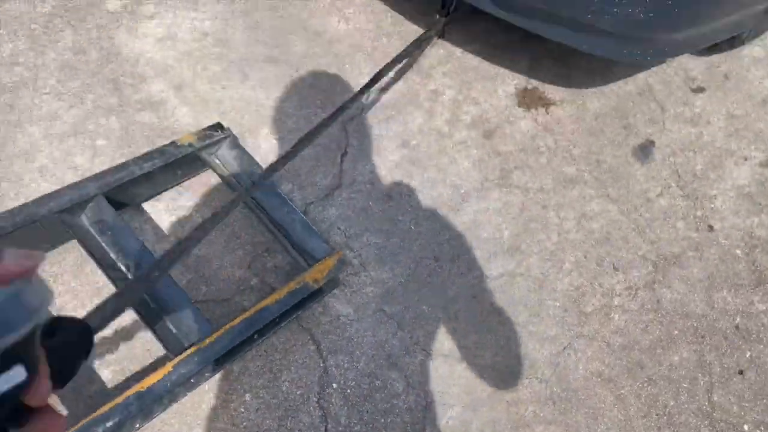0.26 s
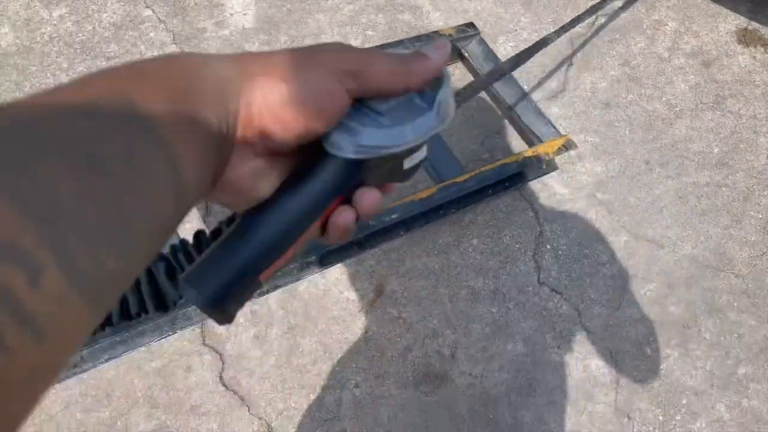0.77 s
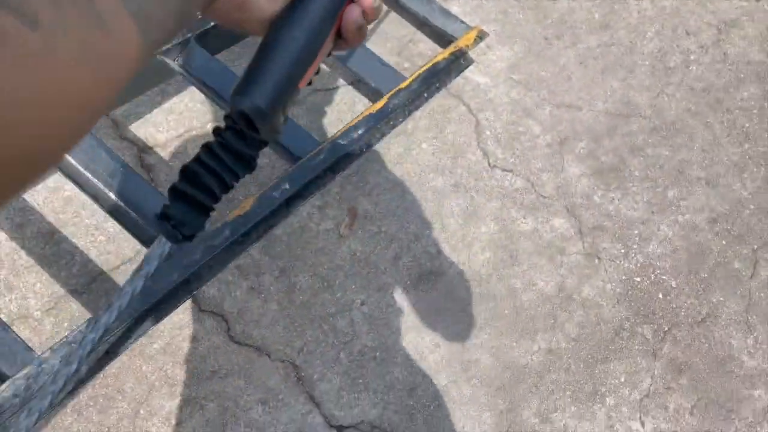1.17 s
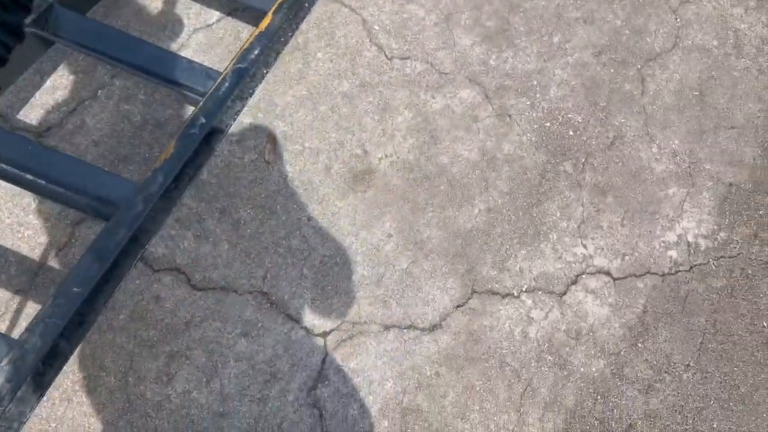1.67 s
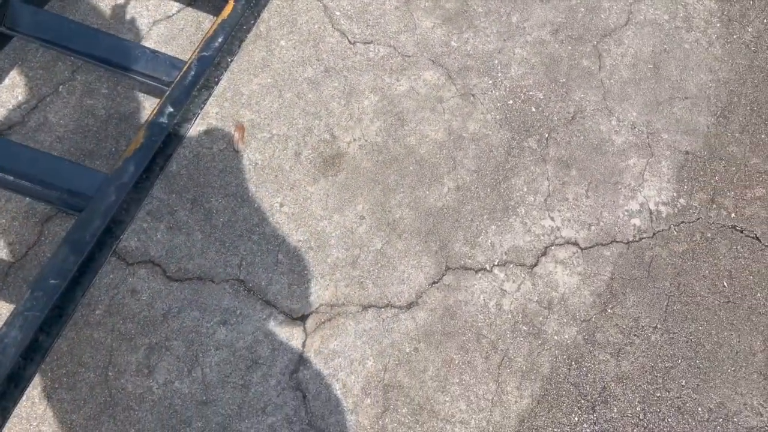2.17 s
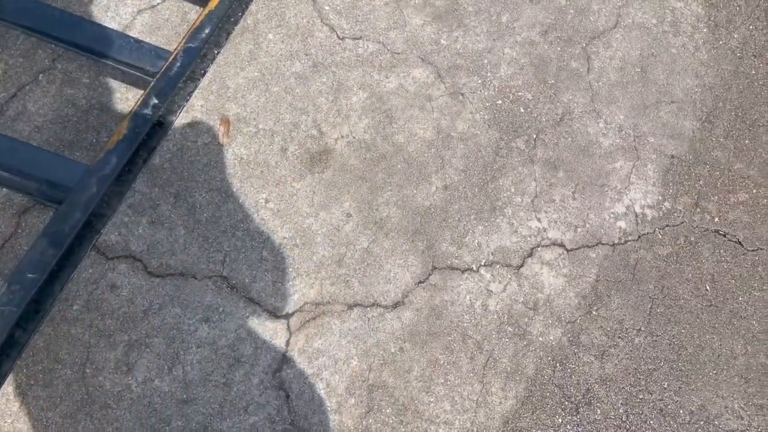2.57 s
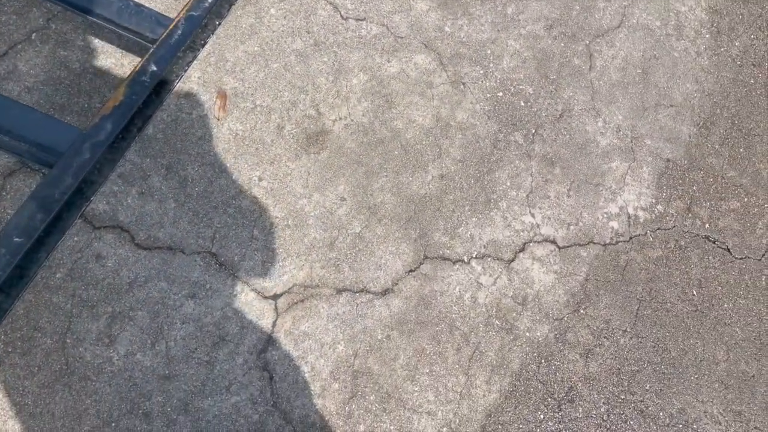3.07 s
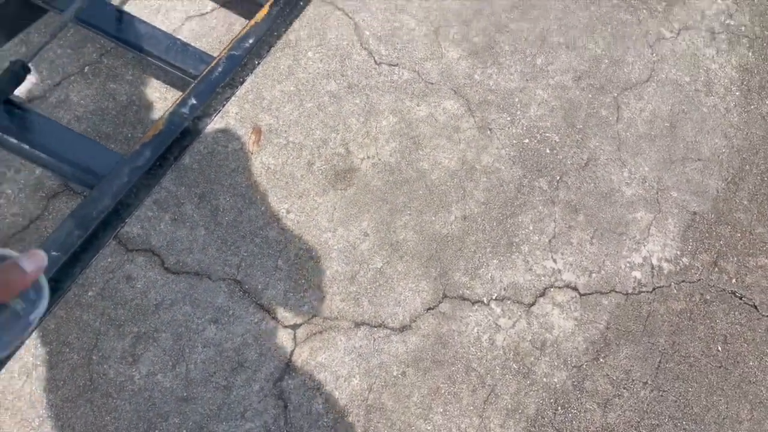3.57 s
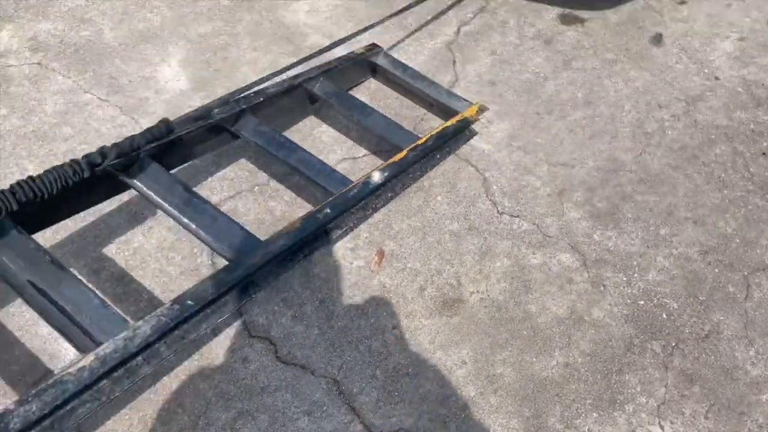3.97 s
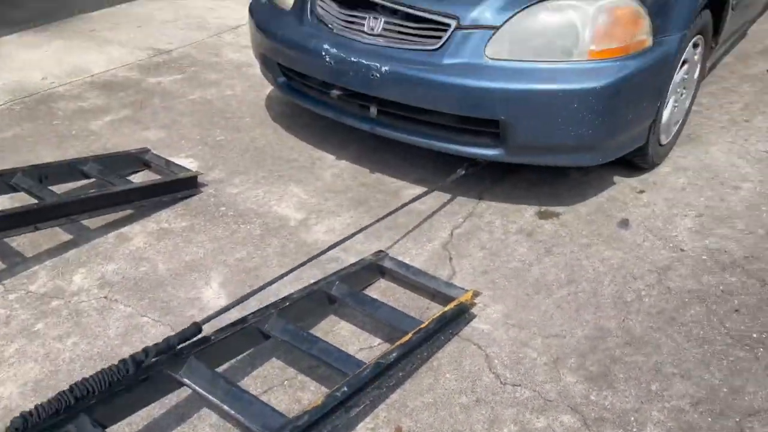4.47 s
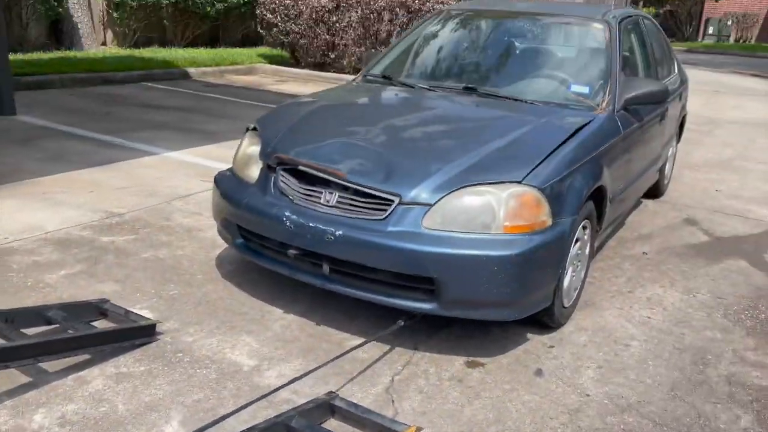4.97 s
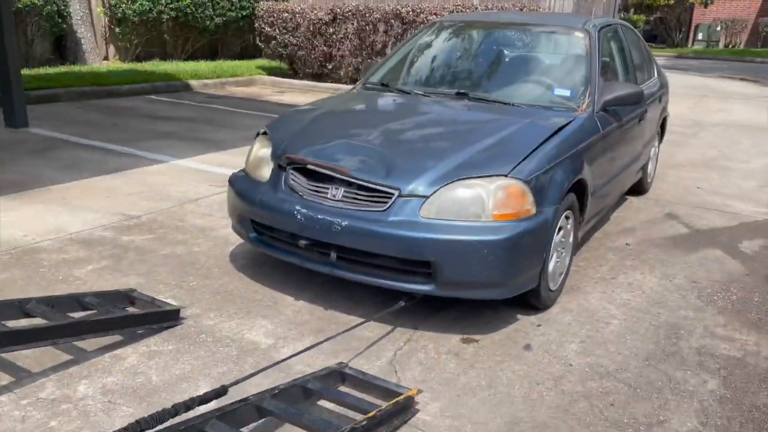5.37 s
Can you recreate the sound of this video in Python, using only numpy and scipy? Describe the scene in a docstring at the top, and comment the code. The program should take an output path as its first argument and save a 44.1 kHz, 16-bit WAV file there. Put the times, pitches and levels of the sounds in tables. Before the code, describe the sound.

A bird whistles hoarsely over a low engine hum and treble hiss. Clicks and rustling lead to knocks, jerks and a grinding burst as a winch takes up its cable, then a loaded drone with gear rasp and faint squeals. A metal ramp bangs on concrete and rings on. The winch fades while the bird chirps clearly, echoing in the open paved space, heard close to the handheld stereo microphone.

```python
"""A hum, a treble hiss and a bird's hoarse falling whistle open the scene: an idling flatbed truck in a car park.
Its electric winch drags a car towards the ramps: the load drives noise-band drone and rumble; gears rasp and whine.
The cable knocks on the drum, the gears jerk, and a steel ramp clanks as a bank of decaying modes.
The bird, made of gliding sines, turns from hoarse to clear and echoes off walls and cars."""
import sys
import numpy as np
from scipy import signal
from scipy.io import wavfile

SR = 44100
rng = np.random.default_rng(int(sys.argv[2]) if len(sys.argv) > 2 else 0)


def to_wav(sig):
    """Store sig (one row per channel, or 1-D mono) as 16-bit WAV at the path in sys.argv[1].

    Samples outside -1..1 are clipped; the rate is SR.
    """
    pcm = np.clip(np.atleast_2d(sig), -1, 1) * 32767
    pcm = np.round(pcm).astype(np.int16)
    wavfile.write(sys.argv[1], SR, pcm.T)  # frames by channels


N = 248283
T = np.arange(N) / SR


def from_db(db):
    """Decibels to gain."""
    return 10 ** (np.asarray(db) / 20)


def rms_one(x):
    """Scale to rms 1."""
    return x / np.sqrt(np.mean(x ** 2) + 1e-20)


def curve(rows):
    """Interpolate (s, value) rows at every sample."""
    s, values = np.transpose(rows)
    return np.interp(T, s, values)


def swell_db(peak_s, level_db, rise_db_per_s, fall_db_per_s):
    """A level that climbs to one peak and falls away."""
    return level_db - np.maximum(rise_db_per_s * (peak_s - T), fall_db_per_s * (T - peak_s))


def at_hz(points, hz):
    """Read a spectrum on a log-frequency axis."""
    table_hz, values = np.transpose(points)
    return np.interp(np.log(hz), np.log(table_hz), values)


def add(out, s, sound):
    """Mix a sound in at time s."""
    i = max(round(s * SR), 0)
    out[..., i:i + sound.shape[-1]] += sound[..., :max(N - i, 0)]


def drift(rate_hz):
    """Random wander of spread 1: low-passed noise, computed every 40 samples."""
    step, settle = 40, 2000
    r = np.exp(-2 * np.pi * step * rate_hz / SR)
    noise = rng.standard_normal(N // step + settle + 2)
    slow = signal.lfilter([1], [1, -2 * r, r * r], noise)[settle:]
    return np.interp(np.arange(N) / step, np.arange(len(slow)), rms_one(slow))


def unsteady(depth, rate_hz):
    """Random swings of a partial's strength and phase together; mean power 1."""
    return (1 + depth * (drift(rate_hz) + 1j * drift(rate_hz))) / np.sqrt(1 + 2 * depth ** 2)


def resonance(x, hz, width_hz):
    """Two-pole resonance with gain 1 on top."""
    r = np.exp(-np.pi * width_hz / SR)
    zeros = np.array([1, 0, -1]) * (1 - r * r) / 2
    poles = [1, -2 * r * np.cos(2 * np.pi * hz / SR), r * r]
    return signal.lfilter(zeros, poles, x + 1e-18)


def bandpass(x, order, low_hz, high_hz):
    """Butterworth band-pass."""
    return signal.sosfilt(signal.butter(order, [low_hz, high_hz], "band", fs=SR, output="sos"), x)


# Left-right likeness of noise. Each row: frequency in Hz, likeness 0-1.
LIKENESS = [(60, 1), (200, 1), (380, 1), (600, 0.87), (1200, 0.082), (2500, 0.16), (4500, 0.016), (7000, 1),
            (11000, 1)]


def banded_noise(spectrum, patchy_db):
    """Half-octave bands of stereo noise, each with its own flicker; rms 1."""
    out, edges_hz = 0, 25 * 2 ** np.arange(0, 9.6, .5)
    white = rng.standard_normal((2, 2, N))
    for k, (low, high) in enumerate(zip(edges_hz, edges_hz[1:])):
        hz = np.sqrt(low * high)
        if high < spectrum[0][0] or low > spectrum[-1][0]:
            continue
        mid, side = bandpass(white[k % 2], 2, low, high)
        alike = np.clip(at_hz(LIKENESS, hz), 0, 1)
        stereo = np.sqrt(1 + alike) * mid + np.sqrt(1 - alike) * np.array([side, -side])
        out = out + from_db(at_hz(spectrum, hz) + patchy_db * drift(12.4)) * stereo
    return rms_one(out)


def tone(hz, level_db, wobble, flutter_db):
    """A machine tone that wavers in pitch and strength."""
    phase = 2 * np.pi * np.cumsum(hz * (1 + wobble * drift(10.6))) / SR
    return from_db(level_db) * rms_one(np.sin(phase) * from_db(flutter_db * drift(28)))


def scatter(x, t60, wet_db):
    """Diffuse reflections from the car park, different in each ear."""
    t = T[:SR]
    tail = rng.standard_normal((2, SR)) * from_db(-60 * t / t60) * np.minimum(t / 0.0031, 1)
    return from_db(wet_db) * signal.fftconvolve(x[None], rms_one(tail) / np.sqrt(SR), axes=1)[:, :N]


def voice_phase(hz, roughness):
    """Phase of a note whose pitch quavers quickly at random."""
    return 2 * np.pi * np.cumsum(hz * (1 + roughness * drift(250)[:len(hz)])) / SR


# Load on the winch, as a drone level. Each row: time in seconds, level in dB.
LOAD_DB = [(0.0, -49.5), (0.82, -45.5), (1.35, -41.5), (1.5, -34), (1.8, -36.5), (2.16, -33), (2.7, -33.5),
           (3.1, -34), (3.51, -33), (3.75, -37), (4.5, -38.5), (5.63, -45)]


def loaded_db(full_load_level_db, db_per_db, full_load_db=-34):
    """The level of a part that grows louder with the load."""
    return full_load_level_db + db_per_db * (curve(LOAD_DB) - full_load_db)


# Motor whine level. Each row: time in seconds, level in dB.
WHINE_DB = [(2.2, -68), (2.55, -62), (2.75, -52.5), (3.25, -52.5), (3.6, -61), (4.0, -59.5), (4.17, -54.5),
            (4.45, -62), (4.58, -64), (4.72, -59), (5.3, -60.5), (5.63, -66.5)]


def motor_whine(hz, wobble=.004, fading=.4, fades_hz=16, throb_db=3.2, throbs_per_s=9):
    """The whine wavers in pitch, fades at random and throbs unevenly."""
    phase = 2 * np.pi * np.cumsum(hz * (1 + wobble * drift(9.3))) / SR
    throb = from_db(throb_db * np.sin(2 * np.pi * throbs_per_s * T + 2 * drift(3)))
    whine = throb * np.imag(unsteady(fading, fades_hz) * np.exp(1j * phase))
    return from_db(curve(WHINE_DB)) * rms_one(whine)


# Gearbox housing resonances. Each row: frequency in Hz, width in Hz, gain in dB.
HOUSING = [(2303, 260, -3), (2450, 140, 2), (2607, 100, 1), (3440, 620, -10), (6390, 860, -15.5)]
# Gear rasp level. Each row: time in seconds, level in dB.
RASP_DB = [(0, -68), (1.2, -53), (1.6, -51.5), (1.9, -52), (2.15, -48.5), (2.6, -48.5), (2.85, -51),
           (3.25, -47), (3.9, -50.5), (4.5, -54), (5.63, -60)]


def gear_rasp(contacts_per_s=1500):
    """Random tooth contacts excite the housing resonances."""
    contacts = (rng.random(N) < contacts_per_s / SR) * rng.standard_normal(N)
    teeth = np.zeros(N)
    for k, (hz, width_hz, gain_db) in enumerate(HOUSING):
        teeth += (-1) ** k * from_db(gain_db) * resonance(contacts, hz, width_hz)
    return from_db(curve(RASP_DB)) * rms_one(teeth)


# Motor speed, as whine pitch. Each row: time in seconds, pitch in Hz.
SPEED_HZ = [(0, 1680), (2.1, 1755), (2.75, 1805), (3.15, 1845), (3.4, 1825), (4.0, 1825), (4.5, 1850),
            (4.75, 1880), (5.63, 1925)]
# Noise spectra of the drone and the brush hiss. Each row: frequency in Hz, relative density in dB.
DRONE_COLOUR = [(100, -1), (180, 1.5), (260, -1), (380, 1), (520, 1.5), (700, -6.5), (950, -9.5),
                (1300, -21.5), (1800, -16), (3000, -37), (5000, -22.5), (12000, -121)]
HISS_COLOUR = [(500, 7.5), (1200, -3), (2000, 9), (3300, 10), (4600, -5), (6500, 11.5), (8500, -0.5),
               (11000, 3), (12500, -3)]
# Hiss level before its lift. Each row: time in seconds, level in dB.
HISS_DB = [(0.0, -47), (0.12, -48), (0.55, -57.5), (1.19, -53), (1.49, -49.5), (1.83, -51), (2.13, -46.5),
           (2.82, -49.5), (3.45, -51), (3.67, -53.5), (5.03, -66.5), (5.63, -63.5)]


def winch(whine_per_mesh=4.61, hiss_lift_db=5.0):
    """Gears drone through the deck, teeth rasp in the housing, the motor whines and its brushes hiss."""
    whine_hz = curve(SPEED_HZ)
    drone = from_db(loaded_db(-32, db_per_db=1.0)) * banded_noise(DRONE_COLOUR, patchy_db=1.71)
    rasp = gear_rasp()
    mesh_db = swell_db(peak_s=3, level_db=-37, rise_db_per_s=14, fall_db_per_s=21)
    mesh = tone(whine_hz / whine_per_mesh, mesh_db, wobble=0.00816, flutter_db=-2.0)
    hiss_db = curve(HISS_DB) + hiss_lift_db + 1.37 * drift(57)
    hiss = from_db(hiss_db) * banded_noise(HISS_COLOUR, patchy_db=2.0)
    gears = drone * from_db([[-.4], [.4]]) + rasp + scatter(rasp, t60=0.27, wet_db=2.0) + mesh
    return gears + motor_whine(whine_hz) + hiss


# Deck boom level, in two spells. Each row: time in seconds, level in dB.
BOOM_DB = [(1.2, -62), (1.55, -49), (1.7, -39), (2.4, -40), (2.85, -40.5), (3.15, -50), (3.4, -43.5),
           (3.55, -39), (3.75, -37.5), (3.95, -65), (4.6, -64)]
# Deck rumble spectrum. Each row: frequency in Hz, relative density in dB.
RUMBLE_COLOUR = [(25, -29), (36, -31), (48, -2), (70, 4.5), (100, 0), (160, -3), (230, -2.5), (400, -12.5),
                 (900, -79)]


def truck(hum_hz=120.6, hum_db=-43.5, turn_away_s=4, hum_fade_db_per_s=13, boom_hz=73.44,
          shudder_db=-33, shudder_rise_s=0.12, shudder_fall_db_per_s=14):
    """The idling engine hums; the deck booms, rumbles with the load and shudders when the ramp drops."""
    # the hum fades as the microphone turns to the car
    fading_db = hum_db - hum_fade_db_per_s * np.maximum(T - turn_away_s, 0)
    hum = tone(hum_hz, fading_db, wobble=0.008, flutter_db=1.3)
    boom = tone(boom_hz, curve(BOOM_DB), wobble=0.018, flutter_db=3.0)
    since = T - BLOWS[0][0]
    shudder = np.clip(since / shudder_rise_s, 0, 1) * from_db(shudder_db - shudder_fall_db_per_s * since)
    rumble = from_db(loaded_db(-40.5, db_per_db=0.26))
    deck = np.hypot(rumble, shudder) * banded_noise(RUMBLE_COLOUR, patchy_db=1.5)
    return (hum + boom + deck) * from_db([[-1], [1]])


# Grinding spectrum. Each row: frequency in Hz, relative density in dB.
GRIND_COLOUR = [(100, -17), (250, 5), (620, 2.5), (950, 1), (1700, -10), (2700, -2.5), (4500, -40),
                (9000, -26), (12000, -10)]


def grinding(strokes, attack=0.32):
    """Steel grinds with a fast chatter; the pressure of each stroke builds, holds and lets go."""
    pressure = np.zeros(N)
    for s, level_db, length_s in strokes:
        # times in stroke lengths
        pressure += from_db(level_db) * np.interp((T - s) / length_s, [0, attack, .7, 1.2], [0, 1, .8, 0])
    chatter = from_db(2.2 * drift(70))
    return pressure * chatter * banded_noise(GRIND_COLOUR, patchy_db=1)


# Cable slips on the drum. Each row: start in seconds, knock level in dB, grinding level in dB,
# nominal grinding length in seconds.
SLIPS = [(1.291, -29, -30.5, 0.135), (1.832, -25, -43, .085), (3.239, -27, -38, 0.05)]
# Drum modes. Each row: frequency in Hz, relative level in dB, t60 in seconds.
DRUM = [(480, -5, .11), (610, -5, .11), (780, -6.5, .1), (930, -3, .08), (1060, -1.5, .065),
        (1200, -2.5, .055), (1370, -5, .04), (2100, -18, .04), (2800, -17, .04)]


def cable(dispersion_s=0.04, prompt_hz=1200, roughness=.35):
    """Slipping turns knock on the drum, low modes sounding later than high, then grind together."""
    knocks, t = np.zeros(N), T[:SR // 3]
    for s, knock_db, _, _ in SLIPS:
        for hz, mode_db, t60 in DRUM:
            late_s = dispersion_s * max(np.sqrt(prompt_hz / hz) - 1, 0)
            ring = np.imag(unsteady(roughness, 44)[:len(t)] * np.exp(2j * np.pi * hz * t))
            add(knocks, s + late_s, from_db(knock_db + mode_db - 60 * t / t60) * ring)
    strokes = [(s, grind_db, length_s) for s, _, grind_db, length_s in SLIPS]
    return knocks + scatter(knocks, t60=0.28, wet_db=-6.5) + grinding(strokes)


# Jerks of the gears. Each row: start in seconds, level in dB.
JOLTS = [(1.316, -28), (1.341, -29.5), (1.375, -29.5), (1.451, -34), (1.47, -31.5), (1.53, -37)]
# Deck modes. Each row: nominal frequency in Hz, relative level in dB.
DECK = [(260, 1), (400, 1), (525, -0.5), (670, 1.5)]


def jolts(t60=0.11, detune_spread=0.043, level_spread_db=2):
    """The gears jerk as they take up the cable; each jerk thuds through randomly detuned deck modes."""
    out, t = np.zeros(N), T[:SR // 3]
    for s, jolt_db in JOLTS:
        for hz, mode_db in DECK:
            detune, strength = rng.standard_normal(2)
            mode_hz = hz * (1 + detune_spread * detune)
            ring = from_db(jolt_db + mode_db + level_spread_db * strength - 60 * t / t60)
            add(out, s, ring * np.minimum(t / 0.002, 1) * np.sin(2 * np.pi * mode_hz * t))
    return out + scatter(out, t60=0.14, wet_db=-13.0)


# Squeals, groans and, in the first two rows, blurred, distant bird-like calls. Each row: start in seconds,
# length in seconds, start pitch in Hz, end pitch in Hz, level in dB, roughness 0-1.
WAVERING_TONES = [(0.005, 0.085, 2880, 2850, -47, .75), (.96, 0.17, 2690, 2730, -55.5, .9),
                  (1.63, 0.225, 2440, 2520, -48.5, .25), (1.97, 0.14, 2486, 2560, -47, 0.4),
                  (2.19, 0.23, 172.8, 173.3, -35, .15), (2.949, .3, 2590, 2630, -52, .5),
                  (3.1, 0.24, 2470, 2440, -46.5, 0.2)]


def squeals_and_calls(quaver=.065, flutter_db=3.5):
    """Short tones waver in pitch and strength, the more the rougher; the roughest blur."""
    out = np.zeros(N)
    for s, length_s, start_hz, end_hz, level_db, roughness in WAVERING_TONES:
        hz = np.interp(T, [s, s + length_s], [start_hz, end_hz])
        phase = voice_phase(hz, quaver * roughness)
        note = rms_one(np.sin(phase) * from_db(flutter_db * roughness * drift(60)))
        out += from_db(level_db) * note * np.interp((T - s) / length_s, [0, .2, .8, 1], [0, 1, 1, 0])
    return out


# Blows on the steel ramp. Each row: start in seconds, relative level in dB, contact cut-off in Hz.
BLOWS = [(3.441, -34, 7000), (3.4535, -35.5, 3000), (3.4615, -39, 2000), (3.753, -46.5, 6990)]
# Ramp modes. Each row: frequency in Hz, relative level in dB, t60 in seconds.
RAMP = [(441, -7, 1.2), (625, -10, .8), (707, -8, .4), (845, -6.5, .7), (921, -9, .55), (958, -13, 1.2),
        (971, -10, 3.1), (1120, -15, .3), (1260, -16, .3), (1373, -15, .55), (1482, -5.5, .7),
        (1503, -9, 1.1), (1534, -7.5, 1.15), (1580, -7, .4), (1610, -8.5, 1.15), (1645, -8, .45),
        (1707, -10.5, .9), (1850, -16, .35), (2110, -11, .6), (2135, -11, .8), (2162, -6, .35),
        (2215, -15, .35), (2370, -15, .6), (2480, -13, .6), (2864, -8.5, .42), (3639, -18, .5)]


def ramp(level_db=4.0, rattle=.75, rattle_settles_s=.25, right_delay_s=.00057):
    """The ramp shifts and bounces; its steel modes ring, roughened at first by rattling on the concrete."""
    out, t = np.zeros((2, N)), T[:2 * SR]
    arrival = T - np.array([[0], [right_delay_s]])
    roughness = rattle * np.exp(-np.maximum(T - BLOWS[0][0], 0) / rattle_settles_s)
    for hz, mode_db, t60 in RAMP:
        energy = np.zeros(N)  # every blow adds energy to the mode
        for s, blow_db, soft_hz in BLOWS:
            gain = from_db(level_db + blow_db + mode_db) / np.hypot(1, hz / soft_hz)
            add(energy, s, (gain * from_db(-60 * t / t60)) ** 2)
        out += np.sqrt(energy) * np.imag(unsteady(roughness, 25) * np.exp(2j * np.pi * hz * arrival))
    return out * from_db([[1], [-1]])


def clang(level_db=-17, low_hz=760, high_hz=3000, t60=.26, tilt_db_per_octave=-1, count=36):
    """Each blow also wakes a crowd of short-lived modes in the ramp's rungs and rails."""
    out, t = np.zeros((2, N)), T[:SR // 2]
    for hz in np.geomspace(low_hz, high_hz, count) * rng.uniform(.98, 1.02, count):
        decay_db = level_db + tilt_db_per_octave * np.log2(hz / low_hz) - 60 * t / t60
        ring = from_db(decay_db) * np.exp(2j * np.pi * hz * t)
        for s, blow_db, soft_hz in BLOWS:
            phases = np.exp(2j * np.pi * rng.random((2, 1)))
            add(out, s, from_db(blow_db) / np.hypot(1, hz / soft_hz) * np.imag(phases * ring))
    return out


def scrape(start_s=3.435, level_db=-30, length_s=0.062):
    """The ramp scrapes over the concrete as it shifts."""
    return grinding([(start_s, level_db, length_s)])


# Grit crunches under the shifting steel. Each row: start in seconds, level in dB, length in seconds.
CRUNCHES = [(1.31, -43, 0.12), (1.502, -42, 0.032), (1.826, -50, .06), (3.442, -46, 0.12)]


def grit(grains_per_s=700, size_spread_db=4, low_hz=1700, high_hz=9000):
    """Grains of all sizes crack under the steel while it presses on them."""
    pressure = np.zeros(N)
    for s, level_db, length_s in CRUNCHES:
        pressure += from_db(level_db) * np.interp((T - s) / length_s, [0, .2, .6, 1], [0, 1, .8, 0])
    sizes = from_db(size_spread_db * np.minimum(rng.exponential(1, N), 4)) * rng.choice([-1, 1], N)
    cracks = sizes * (rng.random(N) < grains_per_s / SR)
    grains = pressure * rms_one(bandpass(cracks + 1e-18, 2, low_hz, high_hz))
    return grains + scatter(grains, t60=0.13, wet_db=-15.5)


# Small clicks and cracks. Each row: start in seconds, level in dB, centre in Hz.
CLICKS = [(0.131, -23, 7000), (.2025, -28, 6000), (.5038, -31, 7000), (.8386, -36.5, 3000),
          (1.067, -27, 7500), (1.127, -33, 2000), (1.29, -27, 4500), (1.3285, -24, 4000),
          (1.369, -15.5, 4460), (1.399, -32, 3000), (1.469, -29, 4500), (1.725, -27, 8000),
          (1.921, -16, 3400), (2.11, -28, 3500), (3.2396, -27, 6000), (3.265, -21, 6000),
          (3.751, -27, 3100), (3.759, -23, 2200)]


def clicks(click_t60=0.012, spread=2.7):
    """Decaying noise bands: snaps of plastic, grit and steel, and one scuff."""
    out, t = np.zeros(N), T[:SR // 4]
    bursts = [(s, level_db, click_t60, hz) for s, level_db, hz in CLICKS]
    bursts.append((.2344, -37, .39, 6500))  # scuff of the hand on the controller
    bursts.append((3.44, -29.5, .07, 1500))  # crack of steel on concrete
    for s, level_db, t60, hz in bursts:
        noise = rng.standard_normal(len(t))
        burst = rms_one(bandpass(noise, 1, hz / spread, min(hz * spread, SR / 3)))
        add(out, s, burst * np.minimum(t / 0.0035, 1) * from_db(level_db - 60 * t / t60))
    return out + scatter(out, t60=0.073, wet_db=-8.0)


def slur(length_s, start_hz, end_hz, peak_s, roughness, glide_s=.051, linger=2.3,
         second_db=-5.0, voice_gap_hz=255, onset_db=-14, ending_db=-7):
    """A hoarse falling note: the two sides of the syrinx sing a little apart and beat."""
    t = T[:int(length_s * SR)]
    # linger above 1: the pitch waits before it falls
    phase = voice_phase(end_hz + (start_hz - end_hz) * np.exp(-(t / glide_s) ** linger), roughness)
    swell = from_db(np.interp(t, [0, peak_s, length_s], [onset_db, 0, ending_db]))
    voices = np.sin(phase) + from_db(second_db) * np.sin(phase + 2 * np.pi * voice_gap_hz * t)
    return swell * signal.windows.tukey(len(t), .06) * voices


def chirp(length_s, start_hz, end_hz, peak_s, ending_db, glide_s=.022, trills_per_s=102, trill_hz=130,
          trill_grows_s=.055, roughness=.024, onset_db=-4, overtone_db=-25):
    """A note that starts abruptly and clear, drops, and levels out into a fast, grainy trill."""
    t = T[:int(length_s * SR)]
    grown = np.minimum(t / trill_grows_s, 1)
    trill = grown ** 2 * trill_hz * np.sin(2 * np.pi * trills_per_s * t)
    phase = voice_phase(end_hz + (start_hz - end_hz) * np.exp(-t / glide_s) + trill, grown * roughness)
    swell = from_db(np.interp(t, [0, peak_s, length_s], [onset_db, 0, ending_db]))
    voice = np.sin(phase) + from_db(overtone_db) * np.sin(2 * phase)
    return swell * signal.windows.tukey(len(t), .04) * voice


# Hoarse slurs. Each row: start in seconds, length in seconds, level in dB, start pitch in Hz,
# end pitch in Hz, loudest after seconds, pitch roughness as a fraction.
SLURS = [(0.117, 0.1, -29, 3825, 3080, 0.091, 0.022), (0.726, 0.13, -38, 3860, 3210, 0.044, 0.033),
         (1.976, 0.12, -30.5, 3854, 3094, 0.077, 0.021), (2.375, 0.118, -29.5, 3730, 3157, 0.066, 0.023),
         (2.809, .108, -28.5, 3860, 3170, 0.074, 0.027)]
# Clear chirps. Each row: start in seconds, length in seconds, level in dB, start pitch in Hz,
# end pitch in Hz, loudest after seconds, ending relative to the peak in dB.
CHIRPS = [(3.291, 0.1, -32, 3995, 3480, 0.046, -6.5), (3.784, 0.07, -30.5, 3970, 3594, 0.0067, -13),
          (4.279, 0.099, -30.5, 3917, 3584, 0.003, -12), (4.729, 0.12, -28, 4090, 3460, 0.013, -10.5),
          (5.23, 0.12, -28.5, 4100, 3473, .01, -12.5)]
# High ticks before chirps, upturns after slurs, a last upsweep. Each row: start in seconds,
# length in seconds, level in dB, start pitch in Hz, end pitch in Hz, pitch roughness as a fraction.
NOTES = [(0.84, .115, -43, 3230, 3430, .06), (2.925, 0.057, -40, 3480, 3550, .035),
         (3.778, .009, -40, 4550, 4470, .03), (4.272, 0.0076, -44, 4520, 4420, .03),
         (4.721, 0.012, -38, 4620, 4380, .03), (5.217, .009, -47, 5020, 4730, .03),
         (5.616, 0.022, -33.5, 2890, 5360, .03)]
# Nearby walls and cars. Each row: delay to left ear in seconds, to right ear in seconds, gain in dB.
ECHOES = [(.006, 0.0063, -5), (.0191, 0.013, -7.5), (.034, .03415, -12), (.0622, 0.098, -17)]


def bird():
    """Hoarse slurs give way to clear chirps, with brief notes around them; walls and cars echo the song."""
    song = np.zeros(N)
    for s, length_s, level_db, *shape in SLURS:
        add(song, s, from_db(level_db) * slur(length_s, *shape))
    for s, length_s, level_db, *shape in CHIRPS:
        add(song, s, from_db(level_db) * chirp(length_s, *shape))
    for s, length_s, level_db, start_hz, end_hz, roughness in NOTES:
        hz = np.linspace(start_hz, end_hz, int(length_s * SR))
        note = signal.windows.tukey(len(hz), .4) * np.sin(voice_phase(hz, roughness))
        add(song, s, from_db(level_db) * note)
    heard = np.array([song, song])
    for left_s, right_s, gain_db in ECHOES:
        heard += from_db(gain_db) * np.array([np.interp(T - delay, T, song) for delay in (left_s, right_s)])
    return heard * from_db([[-1.7], [-.7]]) + scatter(song, t60=.65, wet_db=-4)


# Rustle spectrum. Each row: frequency in Hz, relative density in dB.
RUSTLE_COLOUR = [(1000, -1.5), (1600, 2.5), (2200, 0), (2900, 1.5), (4000, -7.5), (8000, -38)]


def rustle():
    """Skin and cloth rub, in uneven patches, as the hand lifts the controller."""
    level_db = swell_db(peak_s=0.5, level_db=-49, rise_db_per_s=10, fall_db_per_s=15)
    return from_db(level_db) * banded_noise(RUSTLE_COLOUR, patchy_db=4.0)


def footstep(start_s=3.5, level_db=-31, hz=105, t60=0.5):
    """A step on the concrete: a soft, low, decaying sine."""
    since = np.maximum(T - start_s, 0)
    thump = np.minimum(since / 0.023, 1) * np.sin(2 * np.pi * hz * since)
    return from_db(level_db - 60 * since / t60) * thump


# Gusts on the microphone. Each row: loudest at seconds, level in dB, rise in dB per second,
# fall in dB per second.
GUSTS = [(.2, -45, 12, 14), (5.33, -41, 8, 53)]


def breeze():
    """Light air buffets the microphone: low noise, partly shared by the two channels."""
    eddies = bandpass(rng.standard_normal((3, N)), 2, 38, 64)
    gusts = sum(from_db(swell_db(*gust)) for gust in GUSTS)
    return gusts * rms_one(eddies[2] + 0.82 * eddies[:2])


def scene():
    """Winch, truck and ramp, with the bird and the breeze."""
    pulling = winch() + truck() + cable() + jolts() + squeals_and_calls()
    steel = ramp() + clang() + scrape() + grit() + clicks()
    return pulling + steel + bird() + rustle() + footstep() + breeze()


# Bands where the right channel's phase turns over, giving a wide stereo image.
# Each row: centre in Hz, width in Hz.
PHASE_TURNS = [(900, 490), (4100, 110), (9150, 4160)]


def record(dry, low_cut_hz=37, high_cut_hz=11450, left_lift=0.52, lift_hz=720, lift_width_hz=600):
    """The left channel favours the mids, all-passes turn the right channel's phase; both ends are cut."""
    left, right = signal.sosfilt(signal.butter(4, low_cut_hz, "high", fs=SR, output="sos"), dry)
    left = from_db(-0.6) * (left + left_lift * resonance(left, lift_hz, lift_width_hz))
    for hz, width_hz in PHASE_TURNS:
        right = right - 2 * resonance(right, hz, width_hz)
    return signal.sosfilt(signal.ellip(10, .3, 80, high_cut_hz, fs=SR, output="sos"), [left, right])


dry = scene()
out = record(dry)
to_wav(out)
```